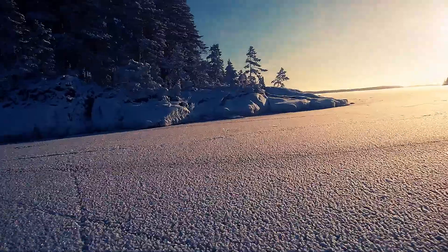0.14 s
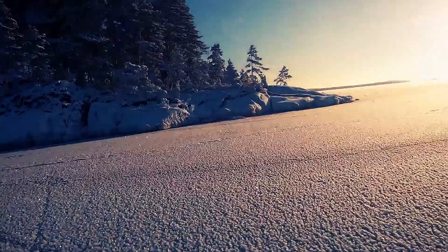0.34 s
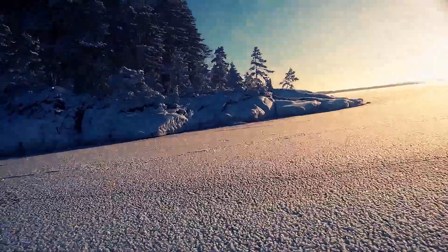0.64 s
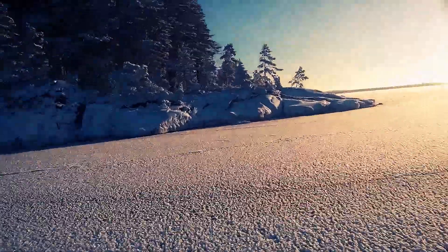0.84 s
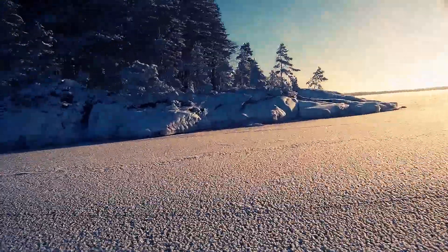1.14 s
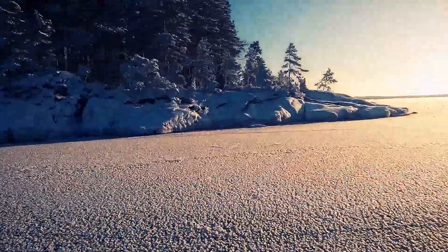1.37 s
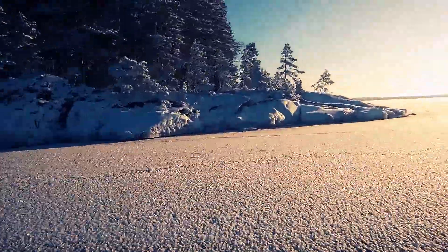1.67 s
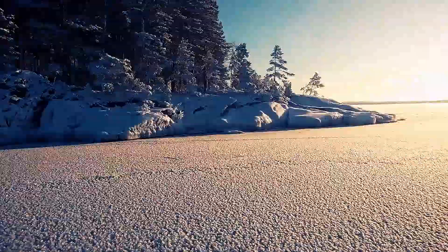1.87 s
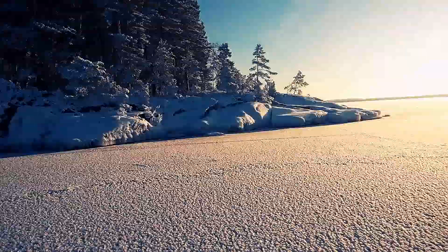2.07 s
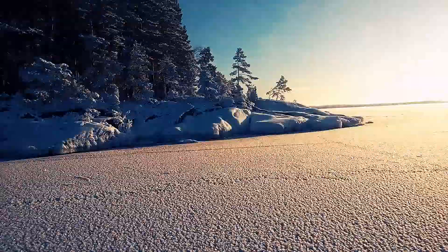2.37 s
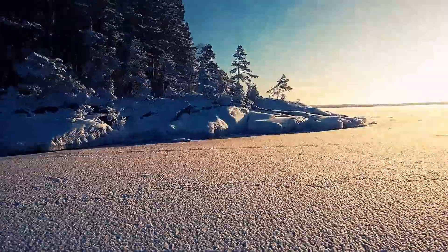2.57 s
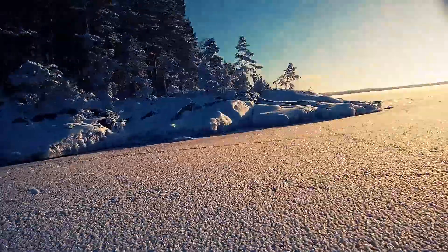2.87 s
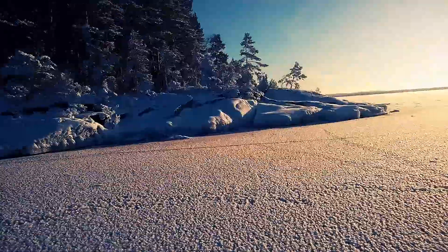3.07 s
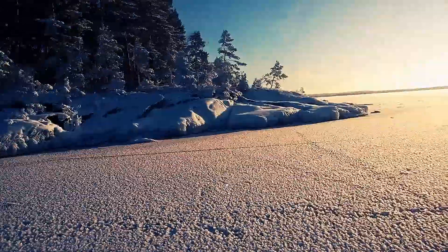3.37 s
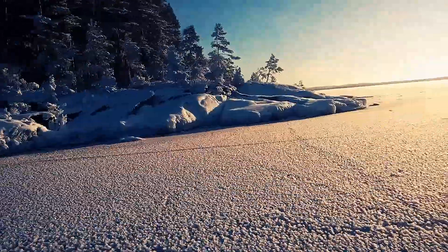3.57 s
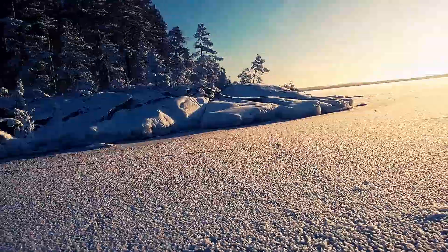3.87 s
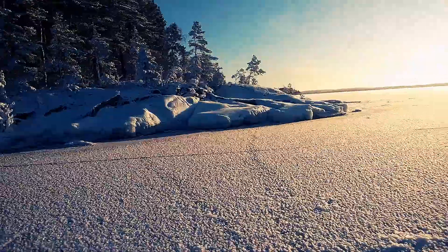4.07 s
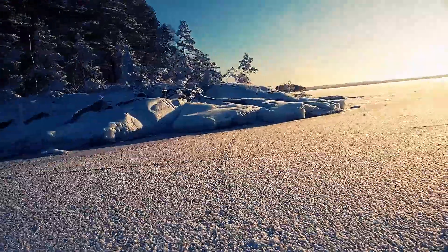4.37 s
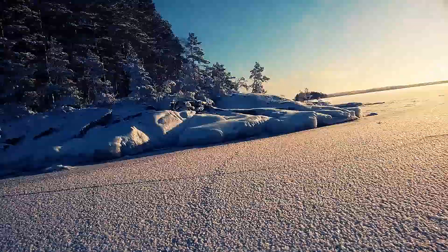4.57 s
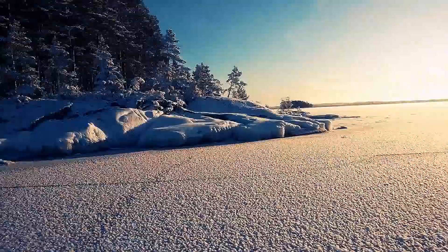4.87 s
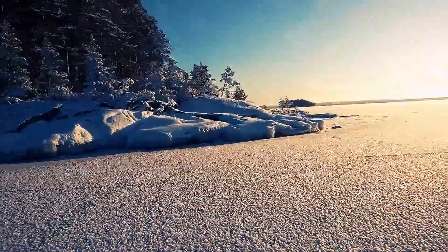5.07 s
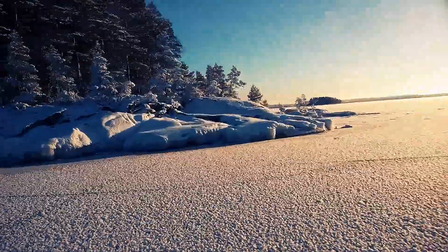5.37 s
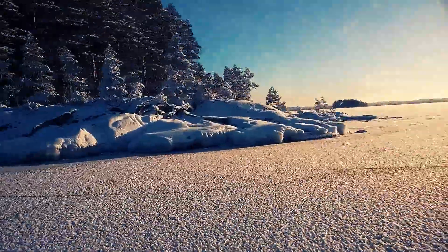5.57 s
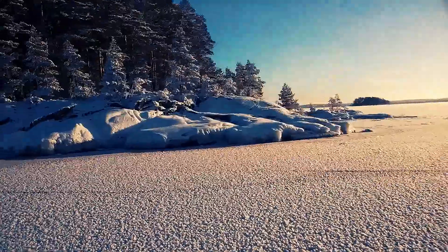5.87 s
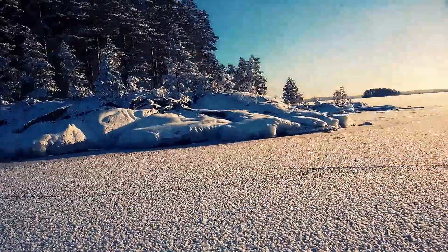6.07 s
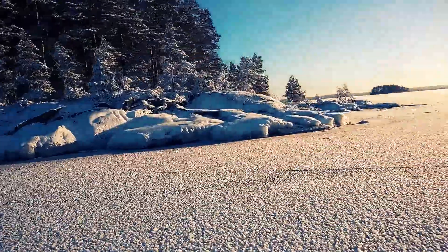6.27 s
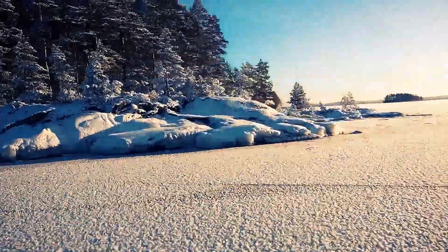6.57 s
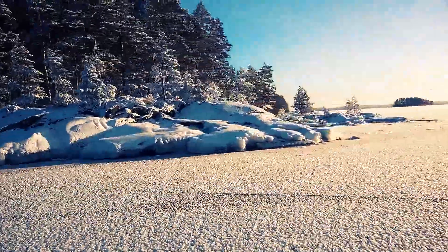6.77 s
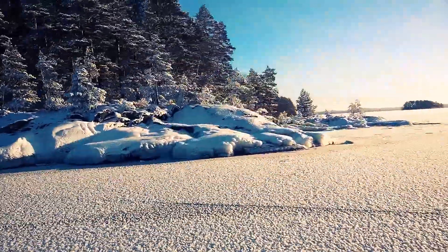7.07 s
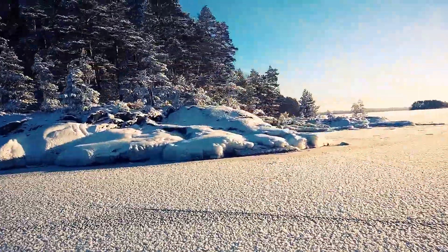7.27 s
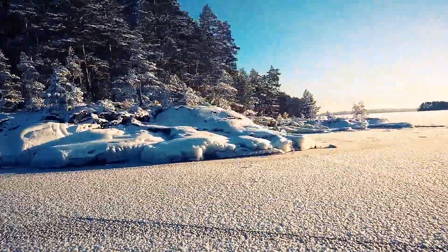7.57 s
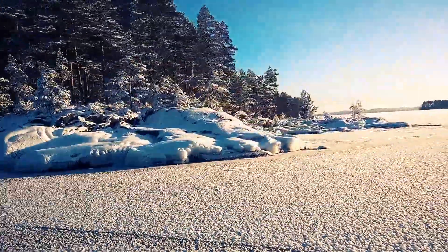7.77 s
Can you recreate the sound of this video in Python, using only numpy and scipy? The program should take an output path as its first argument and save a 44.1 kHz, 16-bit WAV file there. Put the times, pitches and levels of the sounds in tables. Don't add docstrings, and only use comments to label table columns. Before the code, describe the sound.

Skate blades travel over a frost-covered frozen lake, heard dry and close on a small stereo microphone worn near the body. At 0.1 s a hard crack bursts out, followed by knocks and a crunch near 0.5 s with a brief heavier scrape. Small taps and chinks continue over grainy hiss, and a heavy wind thump lands around 1.2 s. At 2.0 s there is a solid knock; from 2.3 to 3.1 s the ride is roughest, with stuttering crunches, bright crystal sprays, a surging hiss and rattling housing. Scattered jolts and ploughing scrapes follow at 3.9-4.5 s, with firm thuds near 4.9 and 5.1 s. Afterwards the hard jolts stop, leaving soft hiss, tiny snaps, crumbling crust and a scraping dig at 7.6 s. Low, lumpy wind buffets and flutters throughout, shifting between sides, with frequent gusts until the end near 8 s.

```python
import sys
import numpy as np
from scipy import signal
from scipy.fft import rfft, irfft, next_fast_len
from scipy.io import wavfile
from scipy.ndimage import uniform_filter1d, minimum_filter1d, map_coordinates

SR = 44100
rng = np.random.default_rng(int(sys.argv[2]) if len(sys.argv) > 2 else 0)


def ratio_of_db(decibels):
    return 10 ** (np.asarray(decibels, float) / 20)


def inscribe(sig):
    pcm = np.round(np.clip(np.atleast_2d(sig).T, -1, 1) * 32767)
    wavfile.write(sys.argv[1], SR, pcm.astype(np.int16))


N = 349977

# [t/s, gust level/dB, left-right/dB, choppiness/dB]
WIND = [(0.0, -37.5, -20, -6), (0.57, -31, -6, -1), (0.97, -31.5, 4, -10), (1.2, -21.5, -4, 2.5),
        (1.46, -34, -6, -8), (1.85, -31.5, -5.5, -4), (2.85, -20, -2.5, 1.5), (2.98, -26.5, 4, 3.5),
        (3.4, -34.5, 6, 0.5), (3.67, -28.5, -28.5, 6), (3.82, -29.5, 21, -13), (4.02, -22.5, -13, -2),
        (4.3, -32, 9, 0.5), (4.66, -20, -7, -3), (4.95, -34.5, 9, -2.5), (5.22, -21, -9.5, 6.5),
        (7.3, -27.5, -9, 3.5), (7.94, -34, 0, -0.5)]
# [t/s, level/dB]
GUSTS = [(0.2, 6), (0.59, 9), (.85, 3), (1.6, 13), (2.05, 1), (2.33, 9), (2.47, -14), (2.6, 3), (3.07, -15),
         (3.2, -4), (3.55, -3), (3.85, -7.5), (4.1, -0.5), (4.22, 5), (4.45, -1), (4.8, -2.5), (5.1, -9),
         (5.265, 2.5), (5.36, -2), (5.45, -3), (5.56, -6.5), (5.66, 0), (5.75, 0.5), (5.85, 0.5),
         (5.95, 4.5), (6.04, -4), (6.2, -1.5), (6.3, -6), (6.42, 4), (6.52, -4.5), (6.6, 2.5), (6.7, 2),
         (6.8, -5.5), (6.9, 5), (7.05, 2), (7.15, 5), (7.27, -3.5), (7.38, 8.5), (7.47, 9), (7.56, -3),
         (7.62, 1), (7.75, 2), (7.89, 3.5)]
# [t/s, level/dB]
LULLS = [(1.795, -10), (3.76, -3), (5.25, -14.5), (5.485, -9), (5.735, 1), (5.855, -9), (6.038, -10),
         (6.16, -6), (6.52, -9), (6.745, -2.5), (7.0, -5), (7.225, -2), (7.285, -10), (7.455, -9),
         (7.545, -9), (7.935, -12)]
# [t/s, peak level/dB]
LOW_BURSTS = [(0.09, -18), (0.197, -13.5), (0.272, -16), (0.346, -13), (0.446, -13.5), (0.492, -8),
              (0.87, -11.5), (1.167, 0), (1.492, -21), (1.574, -17), (1.759, -24), (1.826, -28), (1.975, -16.5),
              (2.027, -7.5), (2.316, -8.5), (2.441, -19), (2.476, -14), (2.538, -10.5), (2.569, -9),
              (2.796, -19), (2.93, -16), (3.068, -17), (3.118, -14), (3.239, -25), (3.37, -16), (3.406, -16),
              (3.478, -17.5), (3.525, -21), (3.621, -10), (3.71, -14), (3.843, -10), (4.016, -8.5),
              (4.21, -15.5), (4.366, -22), (4.431, -7), (4.481, -9), (4.761, -9.5), (4.922, -11), (5.013, -24),
              (5.103, -10), (5.15, -13), (5.21, -18), (5.276, -6), (5.371, -15), (5.418, -17), (5.566, -12),
              (5.606, -18), (5.747, -11), (5.796, -12), (6.304, -10), (6.441, -7.5), (6.558, -6.5),
              (6.711, -12), (6.776, -5.5), (7.049, -10.5), (7.402, -10), (7.47, -23), (7.508, -8.5)]
# [f/Hz, level/dB per Hz]
BUFFET = [(12, -50), (20, 2.5), (38, 4), (92, 1.5), (200, -9), (260, -17.5), (440, -120)]
# [f/Hz, level/dB per Hz]
FLUTTER = [(15, -22), (90, -2), (150, 4), (300, -2), (600, -12.5), (1200, -34), (2400, -46), (4500, -120)]

# [f/Hz, level/dB per Hz]
FROST = [(3000, -7), (5000, -4.5), (6500, -0.5), (10400, 1.5), (12100, -2), (15200, -3), (16200, -1.5)]
# [f/Hz, level/dB per Hz]
BLADE = [(2300, -1), (2900, -3), (3400, -0.5), (4300, 2.5), (5500, -2.5), (7000, -18)]
# [f/Hz, width/Hz, level/dB]
HOUSING = [(1390, 2760, -6.5), (1938, 720, 1.5), (2275, 786, -4)]
# [f/Hz, width/Hz, level/dB]
ICE = [(485, 424, 8.5), (303, 592, 5.5)]
# [f/Hz, left-right/dB]
PORTS = [(300, 2.5), (1000, -2.5), (2000, -10), (4500, -1.5), (6500, 1.5), (9500, -12), (12500, -2.5)]

# [t/s, peak level/dB]
TICKS = [(5.3559, -37), (5.3908, -28), (5.4873, -27), (5.5804, -32), (5.6013, -26), (5.6618, -27),
         (5.6956, -34), (5.8328, -29), (5.8835, -26), (5.9425, -25.5), (6.0665, -24), (6.1007, -31),
         (6.4429, -32), (6.5262, -34), (6.8515, -40), (6.9218, -32), (7.1797, -30), (7.3144, -31),
         (7.4227, -34), (7.7993, -25)]
# [t/s, peak level/dB, swell/s]
SPRAYS = [(0.094, 5, 0.0023), (0.238, -18, 0.0045), (0.344, -26, 0.0094), (0.831, -18, 0.003),
          (0.869, -18.5, 0.0033), (1.108, -25, 0.0028), (1.1588, -26, 0.0028), (2.034, -15, 0.0028),
          (2.3086, -17, 0.011), (2.455, -16.5, 0.015), (2.49, -9, 0.0031), (2.535, -18, 0.0027),
          (2.6233, -7.5, 0.0033), (2.655, -4, 0.0037), (2.733, -8.5, 0.0044), (2.771, -13.5, 0.0063),
          (2.81, -14.5, 0.0048), (2.8335, -18.5, 0.014), (2.856, -19, 0.0048), (2.904, -24, 0.0064),
          (2.987, -14, 0.004), (3.0395, -27, 0.0096), (3.08, -14, 0.0058), (3.846, -17, 0.002),
          (4.23, -31, 0.012), (4.484, -21, 0.016), (5.022, -20.5, 0.01), (5.104, -13, 0.0041),
          (5.886, -28.5, 0.024), (6.0657, -30, 0.011)]
# [middle t/s, half length/s, level/dB, pitch f/Hz]
CRUNCHES = [(0.495, 0.0041, -12.5, 1200), (0.504, 0.0039, -19, 1400), (0.51, .002, -25, 1800),
            (0.514, 0.0044, -24, 1500), (0.533, 0.0012, -8, 1200), (0.558, 0.0053, -30, 1500),
            (0.277, 0.0027, -10, 1810), (2.487, 0.0014, -18, 1300), (2.034, 0.0014, -13, 596),
            (0.139, 0.0027, -24, 1800), (0.207, 0.0044, -29, 1600), (0.43, 0.0069, -28, 1500),
            (1.763, 0.0013, -25, 1100), (2.302, .004, -23, 1200), (2.315, 0.0044, -10, 1830),
            (2.338, 0.0036, -15, 2100), (2.354, 0.0033, -21, 2500), (2.395, 0.0044, -20, 1500),
            (2.413, 0.007, -19, 1800), (2.437, .004, -31, 1600), (2.441, 0.0032, -18, 890),
            (2.458, 0.0074, -22, 1910), (2.49, 0.0023, -15, 2280), (2.514, 0.0033, -21, 1700),
            (2.539, 0.0056, -19, 1300), (2.907, 0.0054, -19, 1390), (2.934, 0.0042, -23, 1200),
            (2.962, 0.018, -27, 2320), (3.024, 0.013, -22, 1500), (3.045, .005, -23, 1800),
            (3.08, 0.013, -14.5, 1700), (3.113, 0.0044, -34, 2000), (3.141, 0.0073, -20, 1500),
            (3.883, .005, -14, 1230), (3.902, 0.015, -30, 1300), (3.986, 0.012, -23.5, 1430),
            (4.435, .008, -14, 1500), (5.28, 0.0041, -13, 1060), (6.462, 0.0026, -30, 2000),
            (6.875, 0.027, -40, 1300), (6.917, .015, -36, 1690), (7.062, 0.03, -35, 1700),
            (7.138, 0.026, -34, 1750), (7.194, 0.015, -33, 1800), (7.25, 0.0048, -31, 1900),
            (7.409, .012, -32, 1800), (7.505, 0.0067, -34, 1800), (7.441, 0.0028, -28, 1700),
            (7.664, 0.0046, -38, 1800)]
# [t/s, peak level/dB, pitch f/Hz]
CRUMBLES = [(6.065, -27, 1300), (6.12, -36, 1110), (6.2502, -22, 1160), (6.3031, -30, 1550),
            (6.433, -34, 2010), (6.49, -26, 1100), (6.524, -30, 2130), (6.5874, -35, 1330),
            (6.622, -20.5, 1330), (6.6756, -42, 2050), (6.7106, -28, 1740), (6.7301, -32, 2060),
            (6.853, -27, 1280), (6.9005, -32, 1640), (6.983, -35, 1610), (7.004, -38, 1530),
            (7.0489, -40, 1720), (7.0683, -30, 1980), (7.0868, -31, 1670), (7.1167, -23, 1250),
            (7.1342, -36, 1750), (7.2275, -31, 1760), (7.2838, -43, 1750), (7.3951, -32, 1990),
            (7.4765, -29, 1800), (7.5733, -17.5, 1700), (7.7074, -41, 1960), (7.7318, -29, 1130),
            (2.029, -12, 1000), (3.715, -29, 1100), (6.478, -28, 2000), (0.35, -21, 1500)]

# [t/s, peak level/dB, knock level/dB, ring level/dB]
JOLTS = [(0.094, 23, -19.5, -19.5), (0.238, -7.5, -21, -19), (0.277, -11, -3, -3.5), (0.348, -16, 4.5, 2),
         (0.490, -12.5, -4, -3), (0.532, 10, -32, -12.5), (0.688, -8.5, -13, -17),
         (0.925, -4.5, -15.5, -34), (1.556, -6.5, -26, -20), (1.709, -10, -21, -10.5),
         (1.762, -7, -9.5, -10.5), (2.037, -10, 0, 1), (2.306, -21, -14, -3), (2.437, -12, -16, -5),
         (2.483, -16, 1, -12), (2.656, -2, -22, -1.5), (2.771, -3, -23, -24), (2.993, -9, -6, -21),
         (3.078, -12, -7.5, -13), (3.121, 1, -6.5, -5), (3.845, -6.5, -18, -26), (4.224, -14, -2, 2),
         (4.404, -9, -19, -10), (4.416, -3, -32, -5), (4.428, -5.5, -15, -4), (4.505, -4.5, -9, -10),
         (4.722, -7, -15, -27), (4.886, -9.5, -22, -20), (4.92, -14.5, 1.5, -2), (5.109, -14.5, 3, -4)]
# [t/s, peak level/dB]
THUDS = [(0.464, -21.5), (1.145, -26), (1.157, -16), (1.495, -17), (1.827, -19.5), (1.977, -13.5),
         (2.028, -10), (2.449, -13.5), (2.534, -20), (2.576, -25.5), (2.606, -16), (2.833, -11),
         (2.9, -14.5), (2.933, -23), (3.242, -16), (3.411, -19.5), (3.881, -10), (4.131, -22),
         (4.375, -19.5), (4.623, -16.5), (4.745, -18), (5.023, -19.5), (5.28, -20), (5.355, -22),
         (5.419, -28), (5.595, -19), (5.885, -21), (6.491, -22), (6.85, -23), (7.478, -23.5)]
# [t/s, peak level/dB]
TAPS = [(0.318, -18), (0.853, -22), (0.873, -18.5), (0.947, -11.5), (1.03, -16), (1.112, -12), (1.217, -20),
        (1.54, -22.5), (1.575, -14), (2.095, -24), (2.111, -17.5), (2.299, -23), (2.342, -7.5),
        (2.693, -12), (2.714, -18), (2.73, -18), (2.791, -11.5), (2.815, -22), (2.961, -11), (3.04, -14),
        (3.369, -13.5), (3.448, -20.5), (3.597, -22.5), (4.305, -18.5), (4.482, -13.5), (4.593, -11),
        (4.774, -22.5), (5.712, -15.5), (6.251, -25), (7.797, -23)]
# [t/s, peak level/dB]
CHINKS = [(0.137, -27), (0.677, -23), (0.733, -14.5), (0.796, -14.5), (0.832, -36), (1.088, -19),
          (1.35, -25), (1.47, -20.5), (1.665, -20), (1.857, -15.5), (1.91, -12.5), (2.265, -13.5),
          (2.38, -13), (2.51, -28), (3.483, -13.5), (3.546, -16.5), (3.97, -26), (4.088, -16),
          (4.108, -17.5), (4.928, -9.5), (5.07, -13), (6.019, -19.5), (6.433, -21.5), (6.676, -19),
          (7.181, -16.5), (7.283, -24), (7.575, -26)]
# [t/s, peak level/dB]
PIPS = [(0.301, -20), (0.417, -26), (0.558, -26), (0.591, -21), (0.645, -21), (1.184, -15), (1.377, -24),
        (1.415, -22), (1.606, -22), (2.174, -28), (3.271, -21), (3.576, -21), (3.671, -21), (3.933, -21),
        (4.03, -24), (5.048, -29), (4.157, -39), (4.246, -16.5), (4.567, -18), (4.695, -33), (4.838, -18.5),
        (5.575, -18), (5.656, -22), (6.098, -26), (6.369, -21.5), (6.624, -26), (7.005, -36), (7.203, -24),
        (7.374, -29), (7.434, -25)]

# [t/s, weight on the frost/dB, bite of the edge/dB, coarseness of the crust/dB]
GLIDE = [(0.0, -43, -27, 9.5), (0.33, -45.5, -4, -11), (0.68, -43, 3.5, 5), (0.9, -46, -17, 4),
         (1.5, -42.5, -37, -4), (1.9, -52.5, -13.5, 16.5), (2.32, -42.5, 5.5, 1), (2.5, -34, 2, -8.5),
         (2.83, -53.5, 6.5, 23), (2.96, -34.5, -2, 0.5), (3.2, -49, -9, 15.5), (3.63, -49, -6.5, 0),
         (3.95, -48, 2, 11), (4.99, -44, -5, 1.5), (5.6, -47, 1.5, 10.5), (6.08, -48.5, -8, 7),
         (7.1, -48, -31, 10), (7.94, -52, -15, 8.5)]
# [middle t/s, half length/s, level/dB]
SKIPS = [(0.763, 0.0067, -10), (2.56, 0.011, -15), (2.68, 0.015, -10), (2.71, .008, 2), (2.886, 0.031, -31),
         (2.921, 0.015, -17), (3.058, 0.014, -11), (5.86, 0.018, -4), (2.327, .005, -10),
         (2.369, 0.007, -5), (2.422, 0.0054, -5), (2.472, 0.0037, 8), (2.502, 0.0037, -6),
         (2.525, 0.0074, -9), (2.948, 0.0063, -2.5), (3.0, 0.0055, -2), (3.03, 0.0034, -6),
         (3.114, 0.0038, -5)]
# [middle t/s, half length/s, level/dB]
DIGS = [
    (0.51, 0.032, 6.5),
    (0.684, 0.02, 7),
    (3.886, 0.03, 5),
    (3.99, 0.035, 3.5),
    (4.424, 0.026, 7.5),
    (4.249, 0.0081, 8),
    (6.9, 0.053, -1.5),
    (7.626, 0.035, 3.5),
]


def unit(x):
    return x / np.sqrt(np.mean(x ** 2) + 1e-20)


def along(points, hz):
    f, v = np.transpose(points)
    return np.interp(np.log(hz + 1), np.log(f + 1), v)


def curves(rows):
    s, *cols = np.transpose(rows)
    return [np.interp(np.arange(N) / SR, s, c) for c in cols]


def moments(rows, edge):
    t = np.arange(0, N + 16, 16) / SR
    total = sum(db * np.exp(-np.abs((t - s) / half) ** edge) for s, half, db in rows)
    return np.interp(np.arange(N) / SR, t, total)


def wobble(rate, channels=2):
    knots = rng.standard_normal((channels, int(N * rate / SR) + 4))
    coarse = np.arange(0, N + 16, 16)
    smooth = [map_coordinates(k, [coarse * rate / SR]) for k in knots]
    return np.array([np.interp(np.arange(N), coarse, curve) for curve in smooth])


def filtered(x, response):
    m = next_fast_len(N + SR // 2)
    return irfft(rfft(x, m) * response(np.fft.rfftfreq(m, 1 / SR)), m)[..., :N]


def noise(spectrum):
    return unit(filtered(rng.standard_normal((2, N)), lambda hz: ratio_of_db(along(spectrum, hz))))


def patchy(x, depth_db):
    z = signal.stft(x, nperseg=512)[2]
    field = uniform_filter1d(rng.standard_normal(z.shape), size=14, axis=1)
    field = uniform_filter1d(field, size=8, axis=2)
    return unit(signal.istft(z * ratio_of_db(depth_db * unit(field)), nperseg=512)[1][:, :N])


def resonances(modes):
    def mode(f, centre, width, db):
        return ratio_of_db(db) * 1j * f * width / (centre * centre - f * f + 1j * f * width)
    return lambda f: sum((-1) ** k * mode(f, *row) for k, row in enumerate(modes))


def shell_mass(f, corner_hz, damping):
    return 1 / (1 + (1j * f / corner_hz) * damping - (f / corner_hz) ** 2)


def housing(f):
    return resonances(HOUSING)(f) * shell_mass(f, 2700, 1.46) ** 2 + ratio_of_db(along(BLADE, f) - 20.5)


def sides(left_right_db):
    return ratio_of_db(np.array([left_right_db, -left_right_db]) / 2)


def wind():
    buffet_db, pan_db, choppy_db = curves(WIND)
    gust_s, lull_s, burst_s = 0.047, 0.015, 0.015
    breaks = moments([(s + 0.014, burst_s, 0.5 * (db + 17.5)) for s, db in LOW_BURSTS], edge=4.6)
    buffet_db = buffet_db + moments([(s, gust_s, db) for s, db in GUSTS], edge=0.88)
    buffet_db = buffet_db + moments([(s, lull_s, db) for s, db in LULLS], edge=3.6)
    buffet_db = buffet_db + 0.38 * breaks - 1.5
    flutter_db = -8 + choppy_db + 0.81 * breaks

    eddies = 1.67 * np.tanh(wobble(21))
    buffet = unit(ratio_of_db(3.83 * eddies) * noise(BUFFET))
    snaps_db = 11.0 * np.tanh(0.69 * wobble(50)) + 12.0 * np.tanh(0.72 * wobble(110))
    flutter = unit(ratio_of_db(3.64 * eddies + snaps_db) * noise(FLUTTER))

    slaps_per_s, slap_db, slap_spread_db = 26, -6, 3.5
    draw = rng.random((2, 2, N))
    slap_level = slap_spread_db * np.tanh(rng.standard_normal((2, N))) + 1.6 * eddies
    slaps = (draw[0] < slaps_per_s / SR) * np.sign(draw[1] - 0.7) * ratio_of_db(slap_level)
    slaps = filtered(slaps, lambda hz: ratio_of_db(along(FLUTTER, hz)))
    flutter = flutter + ratio_of_db(slap_db) * unit(slaps)

    thumps = np.zeros((2, N))
    for s, db in LOW_BURSTS:
        thumps[:, round((s + 0.006) * SR)] = -ratio_of_db(db + 2.7 * np.tanh(rng.standard_normal(2)))
    thumps = filtered(thumps, lambda hz: ratio_of_db(along(FLUTTER, hz) + 31.0))
    return ratio_of_db(buffet_db + 5.5) * sides(pan_db) * (buffet + ratio_of_db(flutter_db) * flutter) + thumps


def ticks():
    snaps, t = np.zeros((2, N)), np.arange(SR // 100) / SR
    for s, db in TICKS:
        bright = unit(np.diff(rng.standard_normal((2, len(t) + 3)), n=3, axis=1))
        start = round(s * SR)
        snaps[:, start:start + len(t)] += ratio_of_db(db + 5.0 - 60 * t / 0.012) * bright
    return snaps


def small_bumps():
    kinds = [(THUDS, -1.7, -22), (TAPS, -8.5, -26), (CHINKS, -18.5, -14.5), (PIPS, -15.5, -20)]
    return [(s, db, knock_db, ring_db) for events, knock_db, ring_db in kinds for s, db in events]


def sprays():
    t = np.arange(N) / SR
    puffs = np.zeros(N)
    dust = [(s, db - 8.5, 0.0045) for s, db, *_ in small_bumps()]
    for s, db, swell in SPRAYS + dust:
        near = slice(max(round((s - 0.02) * SR), 0), round((s + 0.08) * SR))
        age = (t[near] - s) / np.clip(swell, 0.001, 0.02)
        puffs[near] += ratio_of_db(db) * np.exp(-np.abs(age - 0.6) ** 1.26)
    puffs = puffs * ratio_of_db(3.43 * wobble(350, channels=1))
    late = np.roll(puffs, round(0.00074 * SR), axis=1)
    grains = rng.standard_normal(N) + 1.38 * rng.standard_normal((2, N))
    crunch = filtered(late * grains, housing)
    return ratio_of_db(-12.5) * puffs * noise(FROST) + ratio_of_db(2.5) * crunch


def crunches():
    crumbs_per_s, width_over_pitch = 1000, 0.5
    grain_s, grain_db = 0.00209, -3
    out, t = np.zeros((2, N + SR)), np.arange(-2048, 2048) / SR
    f = np.fft.rfftfreq(len(t), 1 / SR)
    grains = [(s + grain_s, grain_s, db + grain_db, hz) for s, db, hz in CRUMBLES]
    for s, half, db, hz in CRUNCHES + grains:
        draw = rng.standard_normal((3, len(t)))
        crumbs = 0.26 + 3.7 * (rng.random(len(t)) < crumbs_per_s / SR)
        crumbs[len(t) // 2 - round(0.4 * half * SR)] = 6
        swell = np.exp(-np.abs(t / half) ** 6.5) * crumbs * (draw[0] + 0.7 * draw[1:])
        ring = resonances([(hz, width_over_pitch * hz, 0)])(f) * shell_mass(f, 2800, 1.4)
        ring = ring + ratio_of_db(along(BLADE, f) - 20)
        burst = irfft(rfft(swell) * ring, len(t))
        burst *= 2 * np.sqrt(half * SR) / np.linalg.norm(burst)
        start = round(s * SR)
        out[:, start:start + len(t)] += ratio_of_db(db - 10.5) * burst
    return out[:, len(t) // 2:len(t) // 2 + N]


def bumps():
    ping_t60 = 0.012
    t = np.arange(SR // 30) / SR
    thud, clack, ring = np.zeros((3, 2, N + len(t)))
    for s, db, knock_db, ring_db in JOLTS + small_bumps():
        draw = rng.standard_normal((4, len(t)))
        t60 = 0.009 * ratio_of_db(2.5 * draw[3, 0])
        blow = ratio_of_db(-60 * t / t60) * (1 - np.exp(-t / 0.0007))
        rebound_s = 0.0038 * ratio_of_db(3 * np.tanh(draw[3, 1]))
        blow += 0.2 * np.roll(blow, round(rebound_s * SR))
        rattle = blow * (draw[0] + 0.11 * draw[1:3])
        rattle[:, 38:42] += 1.44 * np.tanh(2 * draw[3, 2])
        ping_hz = 1400 * ratio_of_db(4.5 * np.tanh(draw[3, 3]))
        ping = ratio_of_db(-60 * t / ping_t60) * (1 - np.exp(-t / 0.0016)) * np.sin(2 * np.pi * ping_hz * t)
        rattle += 0.45 * ping
        rattle *= ratio_of_db(db) / np.linalg.norm(rattle)
        at = slice(round(s * SR), round(s * SR) + len(t))
        clack[:, at] += rattle
        thud[:, at] += ratio_of_db(knock_db) * rattle
        ring[:, at] += ratio_of_db(ring_db) * rattle
    thud, clack, ring = thud[:, :N], clack[:, :N], ring[:, :N]

    def upper(f):
        return (1j * f / 1550) ** 2 * shell_mass(f, 1550, 2.0)

    low_shell = filtered(clack, lambda f: housing(f) * (1 - upper(f)))
    high_shell = filtered(ring, lambda f: housing(f) * upper(f))
    shell = low_shell + ratio_of_db(15.0) * high_shell
    crack = filtered(ring, lambda hz: ratio_of_db(along(FROST, hz) + 1.0) + ratio_of_db(along(BLADE, hz) - 1.0))
    return ratio_of_db(26.5) * shell + ratio_of_db(32.0) * filtered(thud, resonances(ICE)) + crack


def contact():
    return ratio_of_db(moments(SKIPS + DIGS, edge=6.9))


def grit(rate, spread_db, t60):
    draw = rng.random((2, N))
    breaks = (draw[0] < rate / SR) * ratio_of_db(-spread_db * np.log(draw[1] + 0.16))
    return signal.fftconvolve(breaks, ratio_of_db(-60 * np.arange(SR // 10) / SR / t60))[:N]


def glide():
    hiss_db, bite_db, coarse_db = curves(GLIDE)
    ring_db = hiss_db + bite_db
    scrape_db = -49 + 2.44 * (hiss_db + 46.5) + coarse_db
    crust = wobble(28, channels=1)
    chips = unit(grit(170, 9, 0.014))
    hiss = ratio_of_db(0.32 * crust + 1.43 * wobble(90, channels=1)) * (1 + 0.44 * chips)
    hiss = hiss * patchy(noise(FROST), 2.1)
    ring = ratio_of_db(3.3 * crust) * (1 + 0.85 * chips) * patchy(noise(BLADE), 3.5)
    rough = rng.standard_normal(N) + 0.44 * rng.standard_normal((2, N))
    scrape = ratio_of_db(2.6 * crust) * (0.69 + chips) * rough
    scrape = patchy(filtered(scrape, housing), 4.6)
    layers = ratio_of_db(hiss_db + 4.0) * unit(hiss) + ratio_of_db(ring_db + 2.0) * unit(ring)
    return contact() * (layers + ratio_of_db(scrape_db - 3) * scrape)


def scene():
    top_hz, half_delay_s = 15950, 4.5e-5

    def ports(hz):
        lead = np.exp(2j * np.pi * hz * np.array([[-1], [1]]) * half_delay_s)
        return sides(along(PORTS, hz)) * lead * (hz < top_hz)

    blades = ticks() + sprays() + crunches() + bumps() + glide()
    return wind() + filtered(blades, ports)


def top_cut(x):
    return signal.sosfilt(signal.butter(12, 16050, fs=SR, output="sos"), x)


def record(dry):
    need = np.minimum(1, ratio_of_db(-4) / (np.abs(dry).max(axis=0) + 1e-9)) ** 0.8
    gain = uniform_filter1d(minimum_filter1d(need, size=600), size=300)
    return top_cut(dry * gain)


dry = scene()
out = record(dry)
inscribe(out)
```